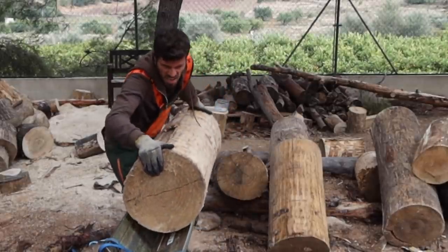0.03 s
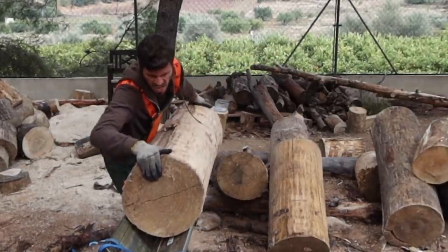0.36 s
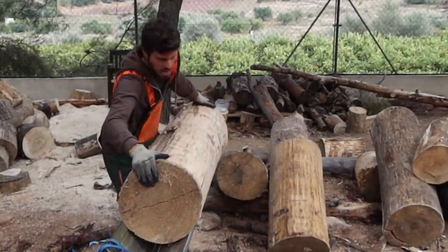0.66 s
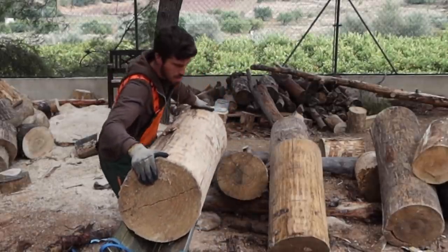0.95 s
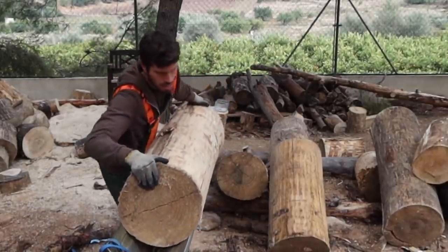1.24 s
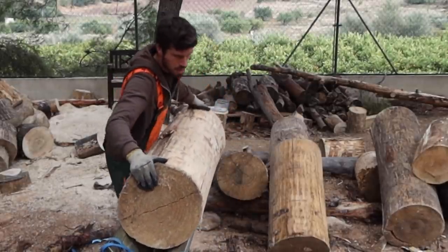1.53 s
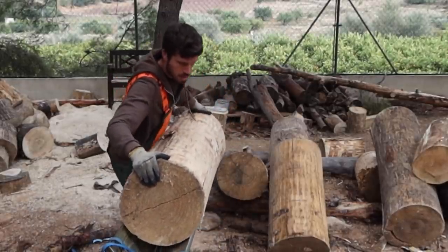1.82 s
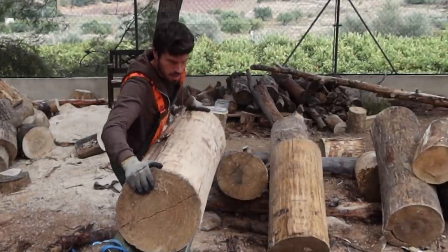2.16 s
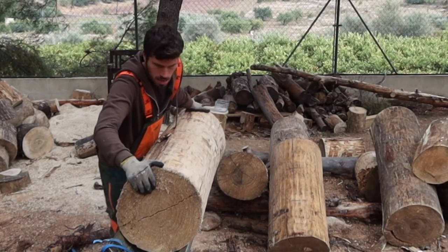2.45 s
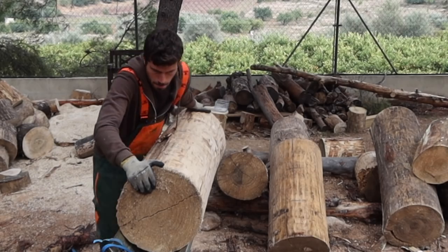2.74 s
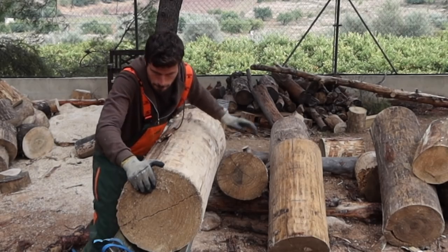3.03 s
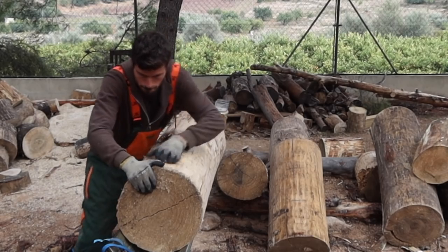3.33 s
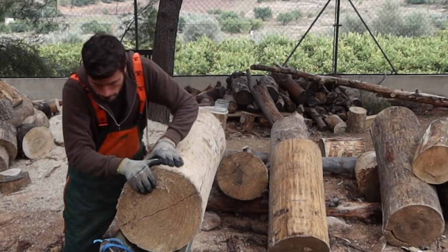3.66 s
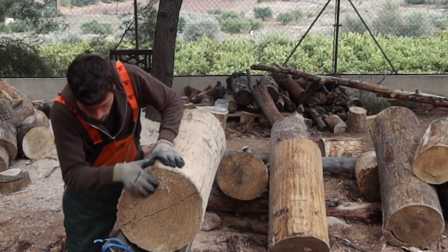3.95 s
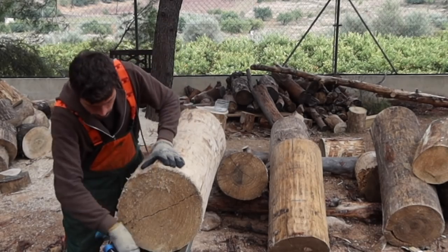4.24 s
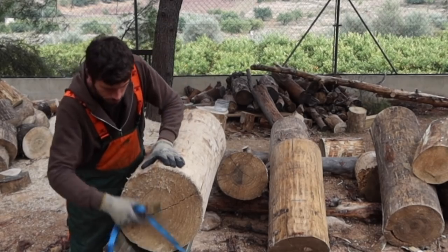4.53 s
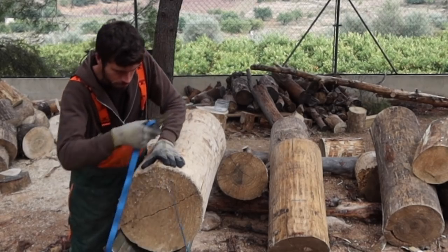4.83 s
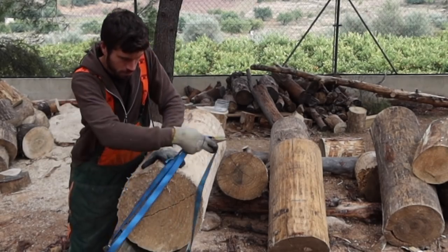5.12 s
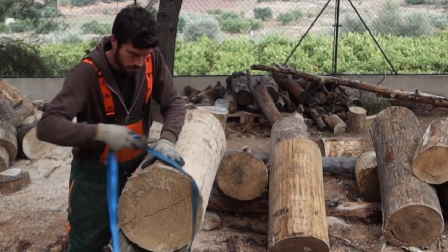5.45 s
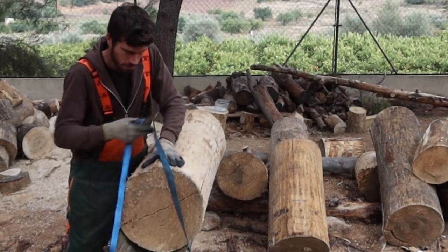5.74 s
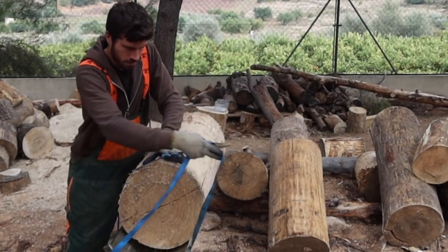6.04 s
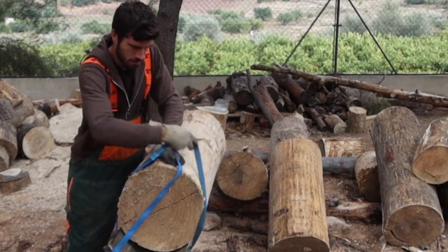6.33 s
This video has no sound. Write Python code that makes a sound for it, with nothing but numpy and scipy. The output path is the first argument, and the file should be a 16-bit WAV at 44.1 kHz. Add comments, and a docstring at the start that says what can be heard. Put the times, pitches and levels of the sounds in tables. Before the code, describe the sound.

Bark scraping on ringing steel, a sharp wooden knock, glove pats and a bright buckle clank over faint outdoor rumble.

```python
"""Outdoors, over a faint distant rumble, a heavy log is shoved along a steel stand. Its bark scrapes,
it rocks and knocks so that the steel rings, and at about 2 seconds it drops into place. Boots shift
on grit, then a glove pats and wipes the wood. Just after 4 seconds the steel buckle of a lashing strap
clanks against the stand. Last, the strap is drawn over the log and a soft tone sounds far off."""
import sys
import numpy as np
from scipy import signal
from scipy.fft import rfft, irfft, next_fast_len
from scipy.io import wavfile
from scipy.ndimage import map_coordinates

SR = 44100
rng = np.random.default_rng(int(sys.argv[2]) if len(sys.argv) > 2 else 0)


def persist_wave(psi):
    """Save psi, clipped to +-1, as 16-bit WAV."""
    counts = np.round(np.clip(psi, -1, 1) * 32767).astype(np.int16)
    wavfile.write(sys.argv[1], SR, np.atleast_2d(counts).T)


N = 281353
T = np.arange(SR * 3 // 4) / SR  # the seconds that one blow lasts
TREBLE_HZ = 800  # divides low sounds from high ones

# The notes (modes) at which the loaded stand rings.
# Each row: pitch in Hz, relative level in dB, seconds to fade by 60 dB (called t60).
STAND_MODES = [(105.3, -3, 0.22), (167.8, -2, 0.18), (218.7, -0.5, 0.28), (260.7, -10, 0.2),
               (306.7, 2, .19), (406, -1, 0.11), (447, -3, 0.26), (663.4, 5, 0.12), (937, -4, 0.25),
               (1105, -1.5, 0.11), (1224, -3, 0.2), (1403, -3, .15), (1558, 3, 0.11), (1860, -7, 0.16),
               (1885, 0, 0.087), (1995, -4.5, 0.27), (2176, -0.5, 0.2), (2390, 1.5, 0.1),
               (2728, -0.5, 0.18), (3000, -1.5, 0.086), (3390, -2, 0.099), (3860, -10, 0.15)]
# The tone colour of wood on steel. Each row: frequency in Hz, relative level in dB.
WOOD_ON_STEEL = [(25, -47), (70, -11), (150, 1.5), (500, -3), (800, -5.5), (1300, -1.5), (2100, -1),
                 (3000, -3), (3700, -8.5), (4600, -20), (6200, -19), (8500, -27.5), (11500, -25.5),
                 (15000, -51)]
# The dull tone colour of the log. Each row: frequency in Hz, relative level in dB.
DULL_WOOD = [(40, -10), (100, -2), (200, -4.5), (500, -11.5), (1500, -16.5), (4000, -51)]
# The dry tone colour of strap, cloth and grit. Each row: frequency in Hz, relative level in dB.
DRY_RUSTLE = [(100, -1), (300, 3.5), (700, -2.5), (1400, 1.5), (2300, 1), (3200, -3.5), (4500, -18),
              (7000, -25), (11500, -26), (15000, -37)]


def amp(db):
    """Turn decibels into a gain to multiply by."""
    return 10 ** (np.asarray(db) / 20)


def unit(x):
    """Scale a sound to an average strength (rms) of 1."""
    return x / np.sqrt(np.mean(x ** 2) + 1e-20)


def along(points, hz):
    """Read between rows of (Hz, value), with octaves evenly spaced."""
    freqs, values = np.transpose(points)
    return np.interp(np.log(hz + 1), np.log(freqs + 1), values)


def filtered(x, response):
    """Turn each frequency up or down by the gain response(hz)."""
    n = x.shape[-1]
    padded = next_fast_len(n + 8192)
    return irfft(rfft(x, padded) * response(np.fft.rfftfreq(padded, 1 / SR)), padded)[..., :n]


def focus(centre_hz, depth_db, octaves):
    """Where and how hard a thing is struck favours one range of pitch: gives a gain for each Hz."""
    return lambda hz: amp(depth_db * (np.exp(-.5 * (np.log2((hz + 1) / centre_hz) / octaves) ** 2) - 1))


def fade(t60, t=T):
    """A gain that falls by 60 dB every t60 seconds."""
    return np.exp(-np.log(1000) * t / t60)


def add(track, start, sound, rise):
    """Mix in a sound at start seconds; the contact builds up over rise seconds."""
    part = track[round(start * SR):][:len(T)]
    part += (sound * (1 - np.exp(-(T / rise) ** 2)))[:len(part)]


def burst(colour, weight, t60, noise=None):
    """Countless modes blur into fading noise. Blows on one spot can share the same noise."""
    if noise is None:
        noise = rng.standard_normal(len(T))
    return unit(filtered(noise, lambda hz: amp(along(colour, hz)) * weight(hz))) * fade(t60)


def ring(modes, blows, scatter_db, rise):
    """Blows (start in seconds, dB, gain for each Hz) feed modes that may still be ringing."""
    hz, db, t60 = np.transpose(modes)
    pole = 2j * np.pi * hz - np.log(1000) / t60  # how fast each mode swings and fades
    waves = np.exp(pole[:, None] * T)
    out, previous = np.zeros(N), 0
    swing = np.exp(2j * np.pi * rng.random(len(hz))) * 1e-9
    for start, blow_db, weight in blows:
        swing = swing * np.exp(pole * abs(start - previous))
        gain = amp(db + scatter_db * rng.standard_normal(len(hz))) * weight(hz)
        # a push a quarter cycle off the present swing adds its energy and jolts the phase
        turn = 1j * rng.choice([-1, 1], len(hz)) * np.exp(1j * np.angle(swing))
        push = np.sqrt(2) * amp(blow_db) * gain / np.linalg.norm(gain) * turn
        add(out, start, (push @ waves).real, rise)
        swing, previous = swing + push, start
    return out


def friction(colour, slips_per_s, spread_db, slip_s, hiss):
    """Tiny slips of uneven size, each a short crunch, over a smooth hiss."""
    slips = (rng.random(N) < slips_per_s / SR) * amp(spread_db * np.clip(rng.standard_normal(N), -2, 2))
    power = signal.lfilter([1], [1, -np.exp(-1 / (slip_s * SR))], slips ** 2)
    crunch = np.sqrt(power / power.mean() + hiss) * rng.standard_normal(N)
    return unit(filtered(crunch, lambda hz: amp(along(colour, hz))))


def with_stand(rub, centre_hz, ring_db):
    """A rubbing sound plus the stand's modes, which it keeps ringing."""
    tap = (0, 0, focus(centre_hz, depth_db=16, octaves=1))
    steel = ring(STAND_MODES, [tap], scatter_db=1, rise=.0007)
    return rub + amp(ring_db) * signal.fftconvolve(rub, steel / np.linalg.norm(steel))[:N]


def wobble(per_s):
    """A smooth curve through per_s random values a second."""
    return map_coordinates(rng.standard_normal(int(N * per_s / SR) + 4), [np.arange(N) * per_s / SR])


def swells(rows, attack_s, release_s):
    """A gain that rises, holds and dies away for each row of start, length and dB."""
    t = np.arange(N) / SR
    power = np.zeros(N)
    for start, length, db in rows:
        rising = np.clip((t - start) / attack_s, 0, 1)
        falling = np.exp(-np.maximum(t - start - length, 0) / release_s)
        power += (amp(db) * rising * falling) ** 2
    return np.sqrt(power)


def distant_rumble():
    """Steady far-off noise, alike in both ears in the bass."""
    # Its tone colour. Each row: frequency in Hz, relative level in dB.
    colour = [(26, -20), (42, -9.5), (63, -6.5), (76, 0), (88, -7.5), (150, -14), (250, -15), (600, -18.5),
              (1200, -21), (2300, -28), (4500, -32), (8000, -40), (12000, -45.5), (15000, -52)]
    # How alike the ears are. Each row: frequency in Hz, likeness (1 means the same).
    likeness = [(60, 0.99), (110, 0.99), (200, 0.22), (600, 0.0017), (1100, 0.14), (2200, 0.73),
                (4000, 0.54), (8000, 0.68), (12000, 0.37)]

    def gains(hz):
        angle = np.arccos(np.clip(along(likeness, hz), -1, 1)) / 2
        return amp(along(colour, hz)) * [np.cos(angle), np.sin(angle)]

    mid, side = filtered(rng.standard_normal((2, N)), gains)
    return amp(-48.5) * unit(np.array([mid + side, mid - side]))


def log_roll():
    """The uneven trunk bumps softly along as it rolls and creeps on the rails."""
    # How loud the rolling is. Each row: time in seconds, level in dB.
    loudness = [(0, -58), (.6, -49.5), (1.3, -58), (1.8, -52.5), (2.8, -57), (4.6, -54), (4.9, -73)]
    times, db = np.transpose(loudness)
    gain = amp(np.interp(np.arange(N) / SR, times, db))
    return gain * friction(DULL_WOOD, slips_per_s=60, spread_db=4, slip_s=.012, hiss=.43)


def fabric_rub():
    """Work clothes rustle all along; later the glove and the strap slide over the wood."""
    # The strokes of glove and strap. Each row: start in seconds, length in seconds, level in dB.
    strokes = [(2.87, 0.072, -56.5), (3.37, .16, -50.5), (3.6, 0.054, -37), (3.77, 0.39, -52.5),
               (5.3, .07, -54.5), (5.5, 0.11, -55.5), (5.8, 0.31, -50.5), (6.28, .09, -54.5)]
    clothes = amp(-58.5 + 2.5 * wobble(per_s=4.09))
    effort = np.hypot(clothes, swells(strokes, attack_s=.051, release_s=.043))
    slide = effort * friction(DRY_RUSTLE, slips_per_s=400, spread_db=7, slip_s=.0038, hiss=.7)
    return with_stand(slide, centre_hz=2220, ring_db=-15.5)


def bark_scrape():
    """Bark catches, slips and splinters on the rails, which ring along."""
    # Shoves drag the log until it sticks. Each row: start in seconds, length in seconds, level in dB.
    shoves = [(.275, 0.067, -49), (.47, 0.089, -38.5), (.585, 0.23, -39), (.85, 0.047, -46),
              (1.21, .1, -41.5), (1.33, 0.1, -39), (1.54, 0.14, -48.5), (1.96, 0.047, -51.5),
              (2.04, 0.13, -41), (2.165, 0.085, -37.5), (2.27, .1, -51.5)]
    # Bark splinters under the load. Each row: start in seconds, level in dB, fade time in seconds.
    splinters = [(.525, -42, 0.082), (0.703, -34.5, 0.13), (0.726, -36, 0.061), (.873, -37, 0.047),
                 (1.19, -45, 0.13), (2.082, -37, 0.048), (2.231, -43, 0.07), (2.262, -38, 0.05)]
    # The tone colour of a splinter. Each row: frequency in Hz, relative level in dB.
    colour = [(500, -30), (2000, -13), (3000, 7), (4500, -18), (6200, -6.5), (8500, -18), (11200, -6.5),
              (12600, -22), (14500, -45)]
    effort = swells(shoves, attack_s=.02, release_s=.038)
    drag = effort * friction(WOOD_ON_STEEL, slips_per_s=170, spread_db=3.5, slip_s=.0057, hiss=.36)
    out = with_stand(drag, centre_hz=2020, ring_db=-14)
    for start, db, t60 in splinters:
        add(out, start, amp(db) * burst(colour, np.ones_like, t60), rise=.0011)
    return out


def log_knocks():
    """The log's weight thuds into the stand's low modes; the hard contact clacks in the high ones."""
    # The log hits the stand. Each row: start in seconds, the clack's relative level in dB and
    # centre in Hz, then the thud's relative level in dB and centre in Hz.
    knocks = [(.327, -39, 1440, -36.5, 330), (.468, -38, 1800, -26.5, 278), (.511, -33, 1290, -39, 300),
              (.660, -34, 1700, -38, 220), (.709, -26, 1800, -54, 296), (.7246, -18, 1100, -20.5, 814),
              (.731, -19.5, 2700, -30, 208), (.745, -16.5, 2430, -43, 600), (.857, -30.5, 1840, -56, 400),
              (.873, -30, 1960, -35, 620), (1.039, -30, 1670, -28.5, 714), (1.082, -46, 2500, -35.5, 218),
              (1.193, -37.5, 2860, -57.5, 400), (1.224, -42, 1110, -24.5, 298),
              (1.233, -40, 1150, -28.5, 640), (1.352, -35, 1300, -33.5, 443),
              (1.534, -38.5, 1550, -41, 312), (1.788, -45, 1560, -43.5, 400),
              (2.032, -11.5, 1900, -18, 250), (2.042, -27, 1100, -23, 600), (2.057, -35, 2800, -22, 225),
              (2.084, -27.5, 2000, -28.5, 302), (2.166, -31, 1500, -31, 474),
              (2.202, -34, 2320, -38.5, 396)]
    out, clacks, thuds = np.zeros(N), [], []
    for start, clack_db, clack_hz, thud_db, thud_hz in knocks:
        hard = focus(clack_hz, depth_db=10.5, octaves=.76)
        soft = focus(thud_hz, depth_db=32, octaves=1.05)
        # wood damps every blow alike
        add(out, start, amp(clack_db - 2.5) * burst(WOOD_ON_STEEL, hard, t60=.12), rise=.0007)
        add(out, start, amp(thud_db - 4) * burst(WOOD_ON_STEEL, soft, t60=.11), rise=.0019)
        clacks.append((start, clack_db - 6, hard))
        thuds.append((start, thud_db - 2.5, soft))
    high_modes = [mode for mode in STAND_MODES if mode[0] > TREBLE_HZ]
    out += ring(high_modes, clacks, scatter_db=1.5, rise=.00041)
    return out + ring(STAND_MODES, thuds, scatter_db=4, rise=.001)


def log_drop():
    """The log's full weight snaps down on the steel edge, once."""
    out, pitch_hz = np.zeros(N), 1990
    snap = amp(7) * np.sin(2 * np.pi * pitch_hz * T) * fade(t60=.0088)
    add(out, start=2.0347, sound=snap, rise=.0008)
    return out


def boots_on_grit():
    """Grit gives way under boots in small dry cracks with hardly any ring."""
    # The clearest cracks, and small taps. Each row: start in seconds, relative level in dB, centre in Hz.
    ticks = [(2.436, -31, 1230), (2.544, -29.5, 1460), (2.568, -30.5, 500), (2.590, -32.5, 1580),
             (2.675, -31.5, 880), (4.182, -36, 1340), (5.595, -34.5, 3020)]
    fine_grit = []
    for _ in range(8):  # finer grit crackles at random while the boots shift
        start = 2.3 + 1.1 * rng.random()
        fine_grit.append((start, rng.normal(-42, 3), 1400 * 2 ** rng.normal(0, .5)))
    out = np.zeros(N)
    for start, db, centre_hz in ticks + fine_grit:
        weight = focus(centre_hz, depth_db=14, octaves=1.2)
        crack = burst(DRY_RUSTLE, weight, t60=.03) + .19 * burst(WOOD_ON_STEEL, weight, t60=.17)
        add(out, start, amp(db - 4) * crack, rise=.0006)
    return out


def glove_pats():
    """The glove pats the wood brightly and the forearm bumps it dully."""
    # Pats and bumps. Each row: start in seconds, level in dB, centre in Hz, fade time in seconds.
    pats = [(3.475, -24.5, 3180, 0.056), (3.481, -35, 1600, 0.21), (3.632, -33.5, 200, 0.13),
            (3.657, -32.5, 1980, 0.15), (3.684, -30, 350, 0.053)]
    out = np.zeros(N)
    for start, db, centre_hz, t60 in pats:
        colour = DULL_WOOD if centre_hz < TREBLE_HZ else DRY_RUSTLE
        weight = focus(centre_hz, depth_db=12.5, octaves=1.15)
        add(out, start, amp(db) * burst(colour, weight, t60), rise=.00091)
    return out


def buckle_clanks():
    """A quick run of steel contacts, each with its own hardness, keeps buckle and rail ringing."""
    # The buckle hits the stand. Each row: start in seconds, relative level in dB, centre in Hz.
    clanks = [(4.286, -41, 3000), (4.297, -32, 210), (4.308, -27.5, 2180), (4.323, -20, 2820),
              (4.332, -13.5, 3430), (4.338, -17, 1090), (4.345, -23.5, 450), (4.353, -26, 1500),
              (4.366, -17, 2620)]
    # Modes of buckle and bare rail. Each row: pitch in Hz, relative level in dB, fade time in seconds.
    modes = [(227.4, -2, 0.19), (392, 0.5, 0.18), (569, -6.5, 0.25), (648, -1.5, 0.13), (867, -10, 0.27),
             (935, -9.5, 0.2), (1081, 4, 0.15), (1203, -1, 0.23), (1317, -4.5, 0.22), (1382, 0.5, 0.11),
             (1538, -3, 0.13), (1615, -3, .11), (1730, -10, .16), (1830, 2, 0.11), (2090, 1.5, 0.14),
             (2130, -4, 0.22), (2240, -6, 0.14), (2430, -5, 0.2), (2702, -11, 0.23), (2920, -5, 0.16),
             (3060, 5.5, 0.073), (3470, -7.5, 0.28), (3611, 2.5, 0.078), (3750, -7, 0.19), (3810, -2, 0.16)]
    # The buckle's free end sings on, two close notes beating. Its rows read the same way.
    free_end = [(1384, -12, .6), (1975, -14.5, .58), (2000, -15.5, .58)]
    # The tone colour of rattling steel. Each row: frequency in Hz, relative level in dB.
    colour = [(150, -14), (400, -6), (800, -18), (1200, -1), (2100, 2), (2550, -0.5), (3100, 3.5),
              (4000, -0.5), (4700, -11.5), (6000, -12), (8500, -15), (12000, -22.5), (15000, -43)]
    out, blows = np.zeros(N), []
    overtones = rng.standard_normal(len(T))
    for start, db, centre_hz in clanks:
        weight = focus(centre_hz, depth_db=15, octaves=.8)
        jangle = amp(db - 10) * burst(colour, weight, t60=.16, noise=overtones)
        click_db = db - 7 + 2 * np.log2(centre_hz / 2500)  # a harder, higher contact clicks more
        click = amp(click_db) * burst(colour, np.ones_like, t60=.11)
        add(out, start, jangle + click, rise=.00062)
        blows.append((start, db - 1, weight))
    return out + ring(modes + free_end, blows, scatter_db=.7, rise=.00048)


def far_tone():
    """A soft, slightly unsteady tone swells in the distance."""
    start, length, db, pitch_hz, width_hz = 6.26, .12, -57, 474, 8.9
    band = lambda hz: np.exp(-.5 * ((hz - pitch_hz) / width_hz) ** 2)
    tone = unit(filtered(rng.standard_normal(N), band))
    return tone * swells([(start, length, db)], attack_s=.04, release_s=.04)


def spread(x):
    """Nearby surfaces make the treble differ between left and right."""
    early = rng.standard_normal(len(T)) * fade(t60=.014)
    reflected = signal.fftconvolve(x, early / np.linalg.norm(early))[:N]
    # The part that differs between the ears. Each row: frequency in Hz, level in dB.
    side_db = [(200, -21), (2200, -65), (4000, -18), (7000, -18), (12000, 0)]
    side = filtered(reflected, lambda hz: amp(along(side_db, hz)))
    return np.array([x + side, x - side])


def yard_echo(x):
    """Log piles and a low wall scatter a short echo, different at each ear."""
    # How long the echo lasts. Each row: frequency in Hz, fade time in seconds.
    fade_times = [(150, 0.36), (1000, 0.34), (3000, 0.26), (10000, 0.74)]
    hz, t, bands = signal.stft(rng.standard_normal((2, SR // 2)), SR, nperseg=256)
    _, tail = signal.istft(bands * fade(along(fade_times, hz)[:, None], t), SR, nperseg=256)
    return signal.fftconvolve(x[None], tail / np.linalg.norm(tail[0]), axes=1)[:, :N]


def scene():
    """All the work happens just ahead, with its lower middle tones leaning to the left."""
    # The left-right balance. Each row: frequency in Hz, left minus right in dB.
    balance = [(120, -0.5), (250, 0), (420, 3), (640, 7.5), (800, 7), (950, -2), (1500, -1.5), (3500, 0),
               (8000, 1)]
    work = log_roll() + fabric_rub() + bark_scrape() + log_knocks() + log_drop()
    work += boots_on_grit() + glove_pats() + buckle_clanks()
    work = filtered(work, lambda hz: (1j * hz / (1j * hz + 45)) ** 2)  # the deepest bass is rolled off
    near = filtered(spread(work), lambda hz: amp(np.outer([.5, -.5], along(balance, hz))))
    return distant_rumble() + near + amp(-27) * yard_echo(work) + far_tone()


def record(dry):
    """Cap the peaks at full scale, then cut away the very highest treble."""
    return filtered(np.clip(dry, -1, 1), lambda hz: hz < 15300)


dry = scene()
out = record(dry)
persist_wave(out)
```